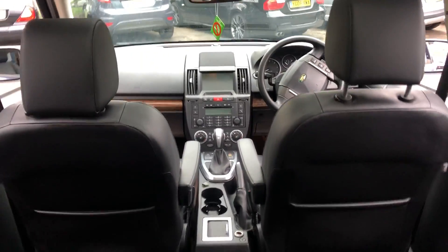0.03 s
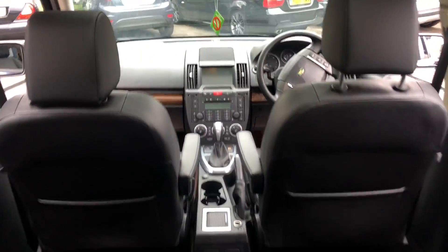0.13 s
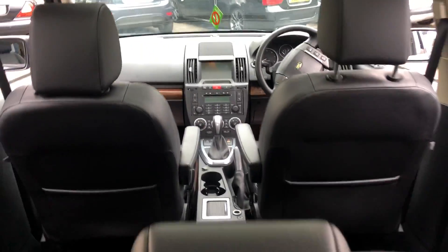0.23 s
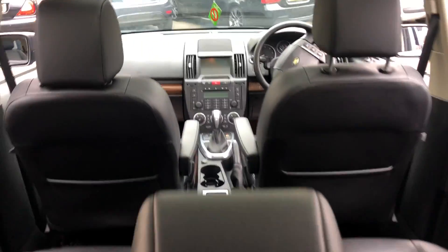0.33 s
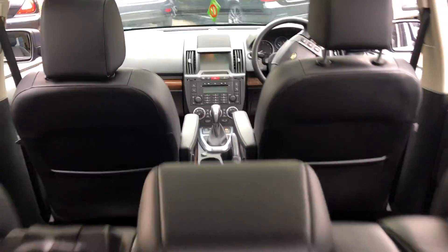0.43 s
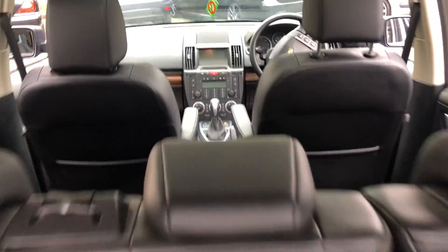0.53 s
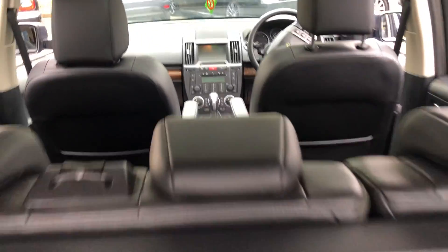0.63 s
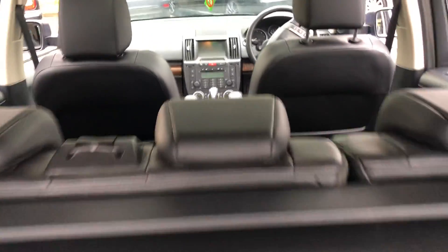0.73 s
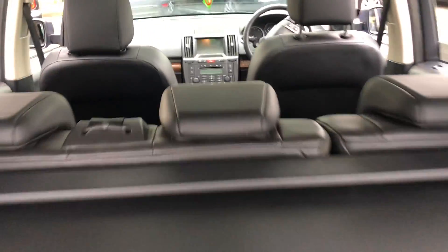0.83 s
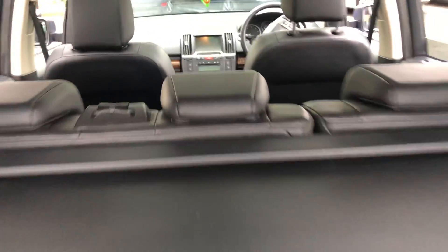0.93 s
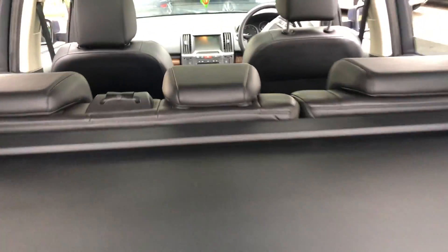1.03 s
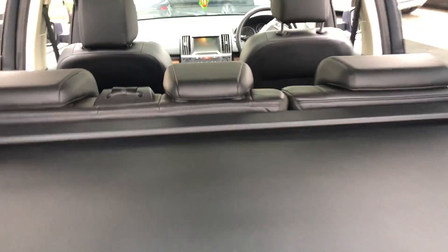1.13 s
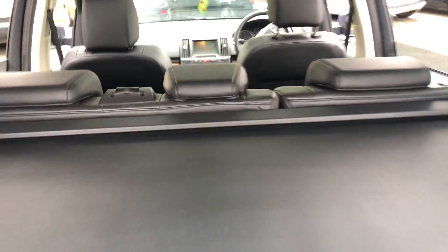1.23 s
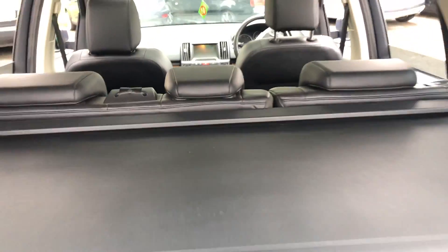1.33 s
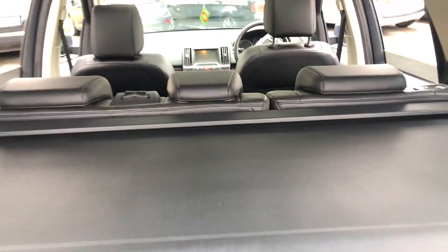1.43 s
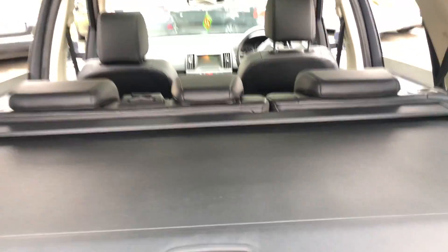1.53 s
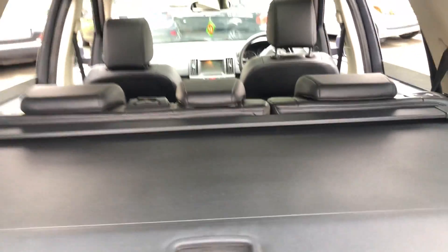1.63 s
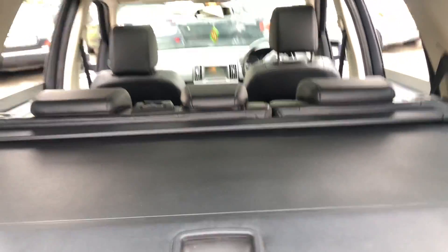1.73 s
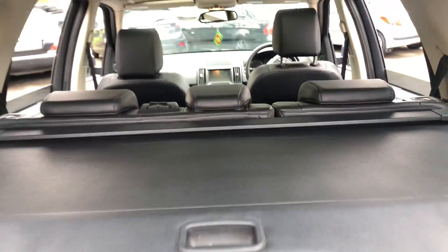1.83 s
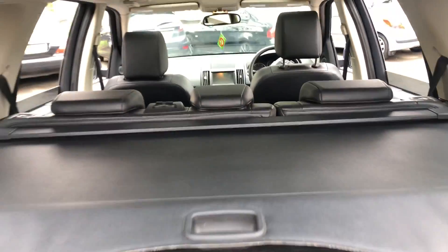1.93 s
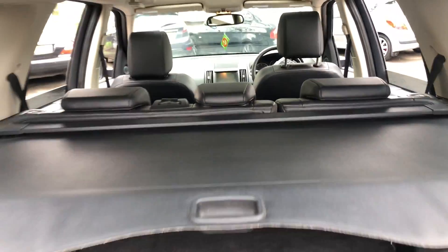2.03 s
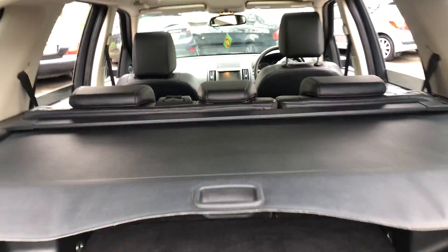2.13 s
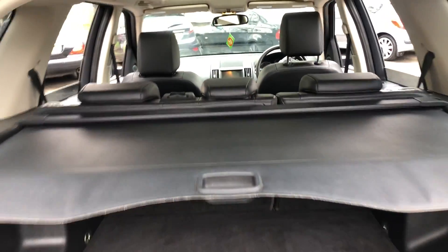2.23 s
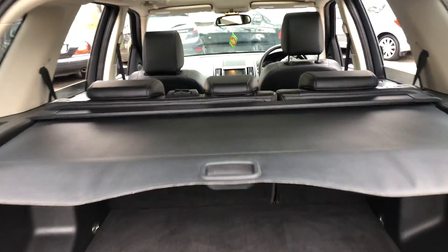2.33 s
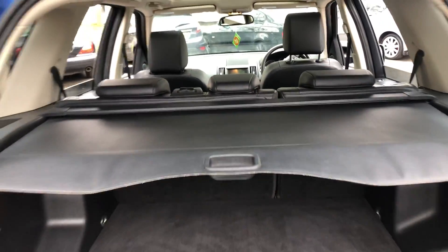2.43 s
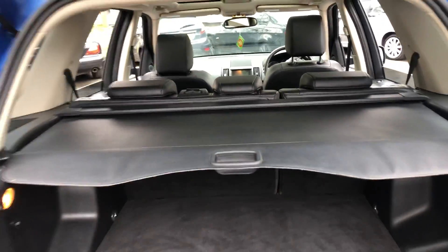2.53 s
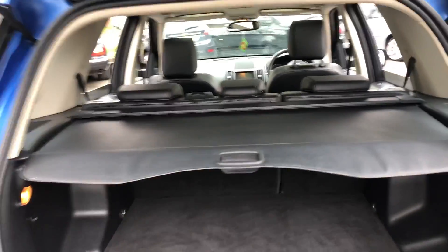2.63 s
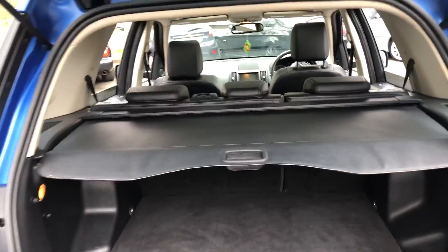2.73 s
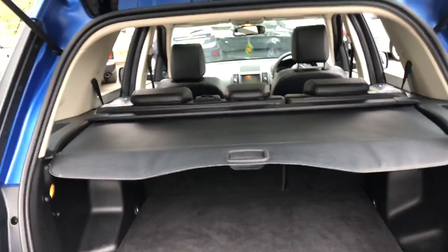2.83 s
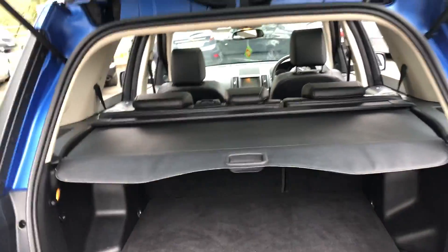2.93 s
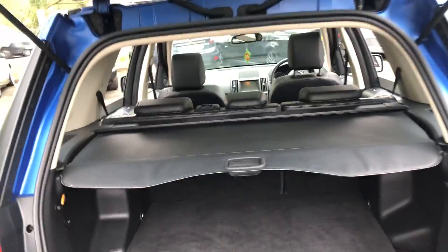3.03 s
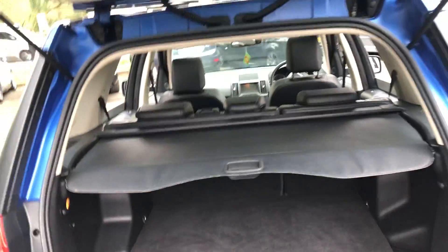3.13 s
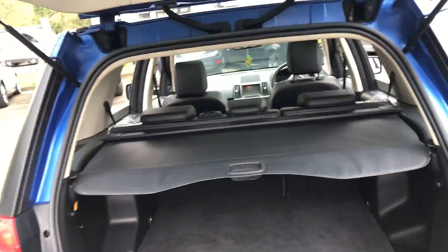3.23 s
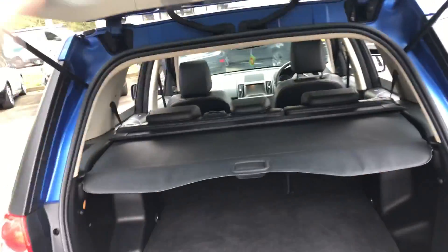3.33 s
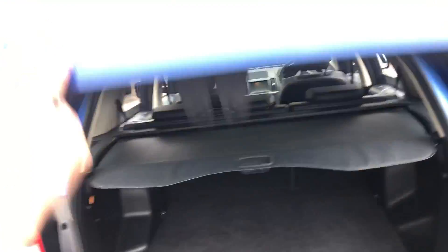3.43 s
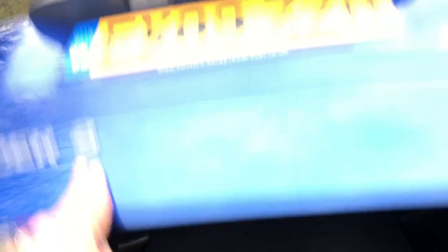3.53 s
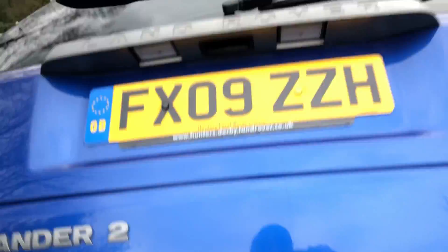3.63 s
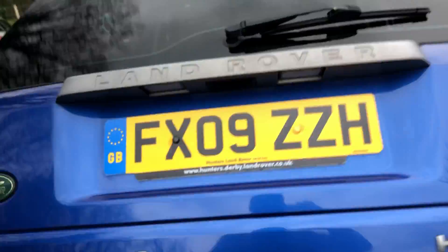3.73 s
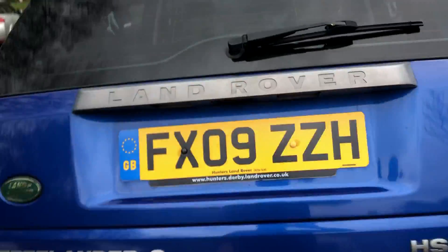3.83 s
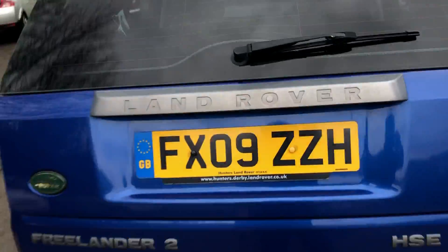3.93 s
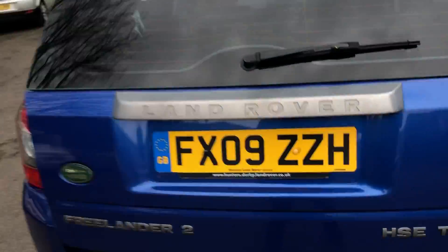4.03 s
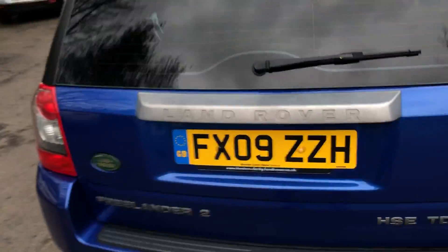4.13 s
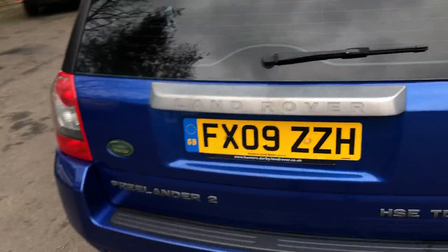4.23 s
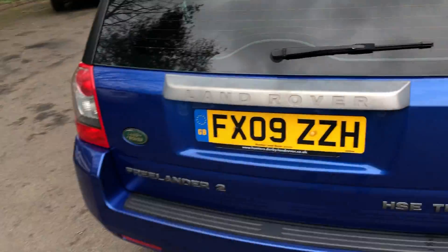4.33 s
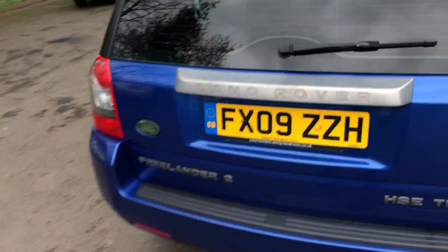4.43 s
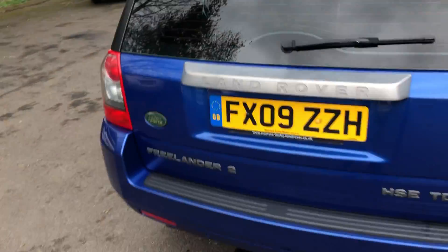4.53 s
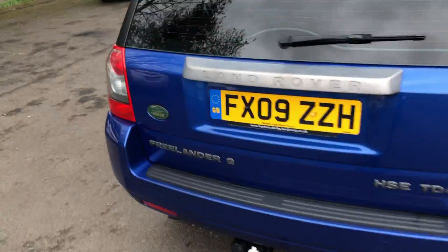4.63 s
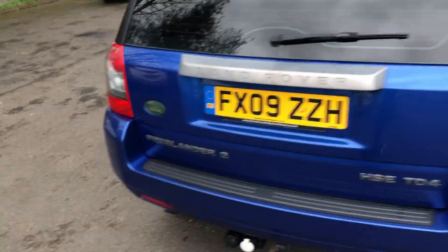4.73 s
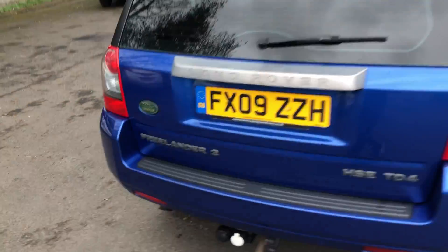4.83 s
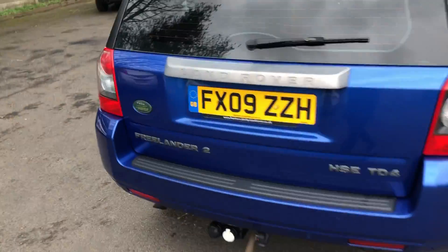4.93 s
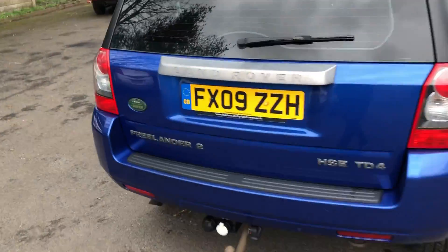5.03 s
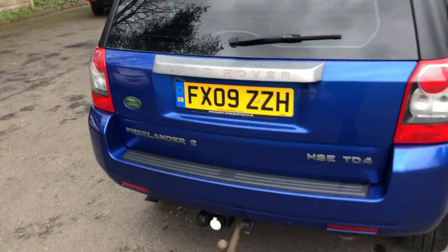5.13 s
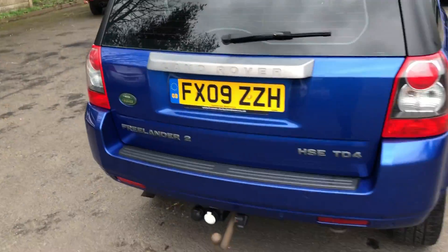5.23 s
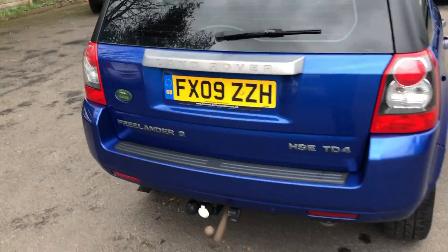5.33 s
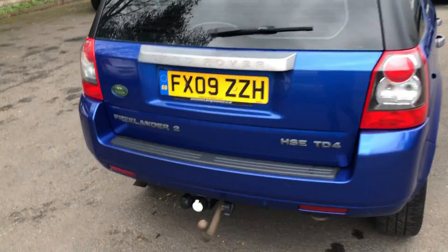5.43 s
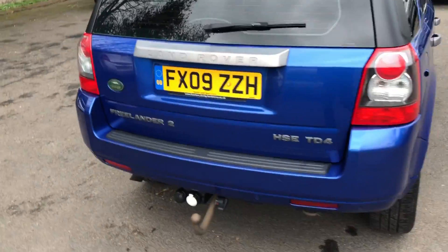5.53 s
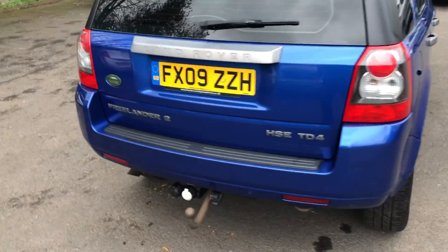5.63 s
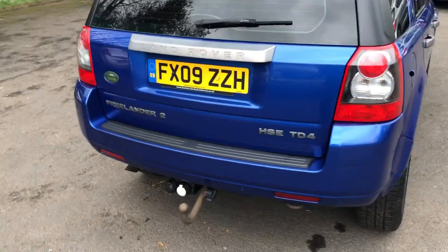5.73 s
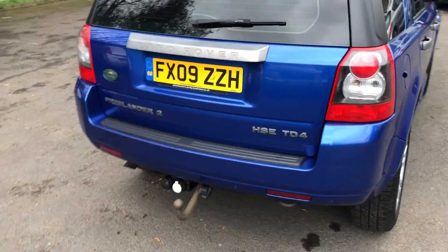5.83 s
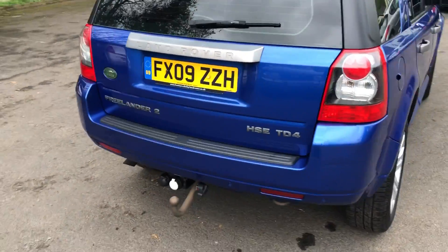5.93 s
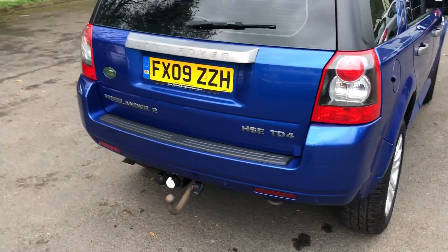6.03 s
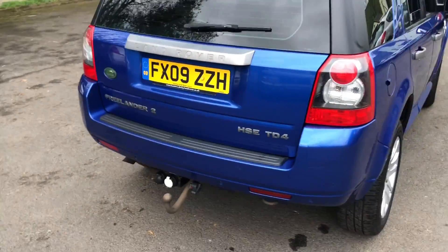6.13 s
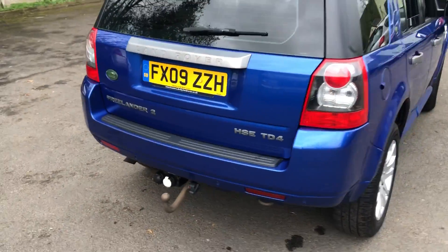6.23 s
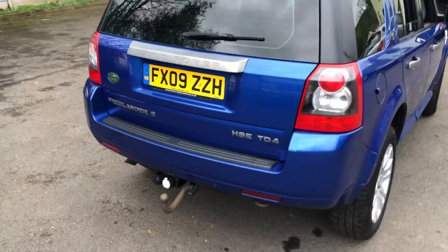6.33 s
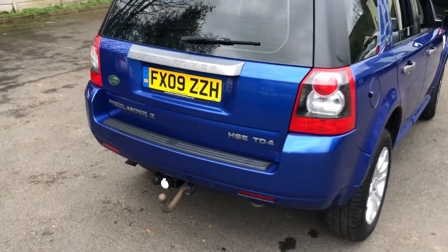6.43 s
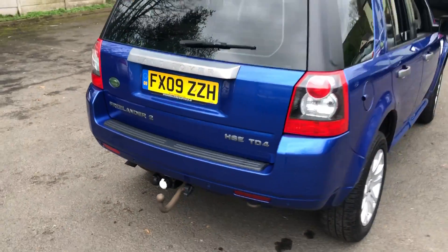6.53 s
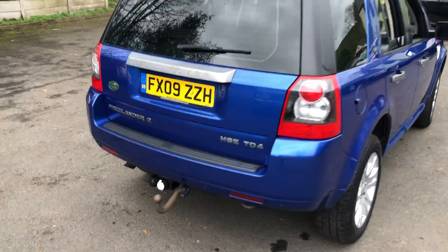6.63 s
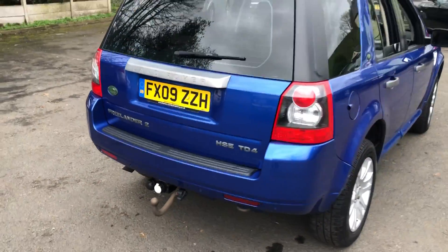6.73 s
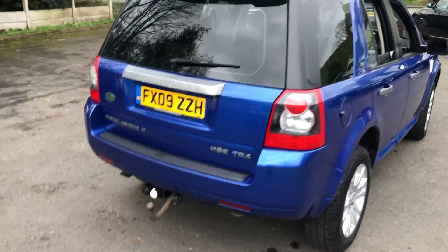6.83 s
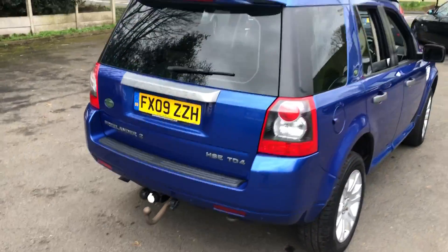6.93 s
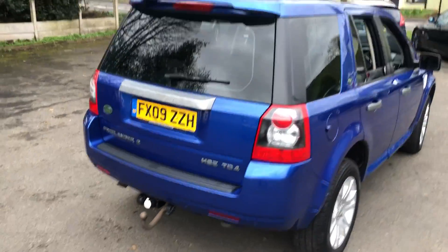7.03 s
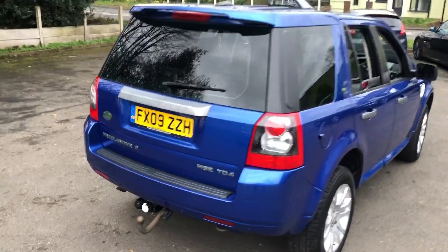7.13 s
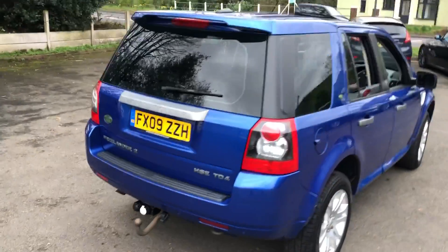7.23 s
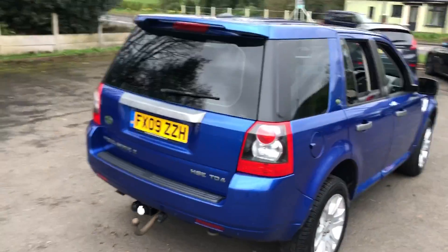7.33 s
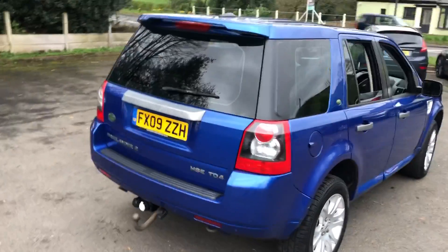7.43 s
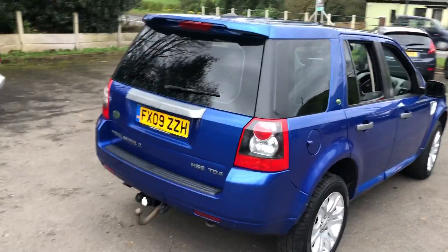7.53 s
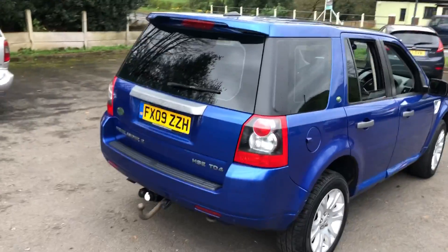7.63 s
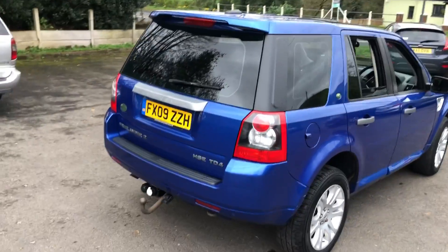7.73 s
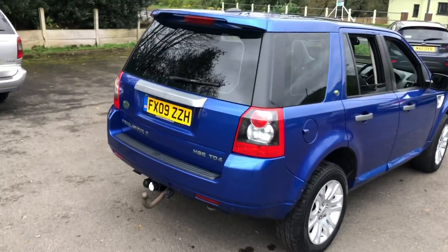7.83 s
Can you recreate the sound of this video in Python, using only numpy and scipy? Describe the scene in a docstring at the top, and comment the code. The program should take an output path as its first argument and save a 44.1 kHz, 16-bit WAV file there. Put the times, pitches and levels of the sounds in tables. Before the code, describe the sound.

A steady low rumble and distant traffic fill a car lot, slightly muffled at first as the microphone moves from the cabin to the outside, rustling faintly. Then a car's tailgate is shut with one loud bang, the latch cracking over a deep thump and a brief chatter of trim. A weak, dull tail dies quickly, leaving the quiet outdoor background with soft hums and a few dry clicks.

```python
"""We start between the seats of a parked car: a thin whine, low hums and shielded outdoor noise.
From about 1 s the microphone backs out of the boot; the whine fades and distant traffic opens up over
the lot's steady rumble, with faint rustles of handling. At 4.26 s the tailgate is slammed once: the latch
strikes, the steel panel booms, the seal pushes air into the cabin and the trim chatters.
A dull tail scatters off cars and walls, leaving the lot with a few more clicks, rustles and hums."""
import sys
import numpy as np
from scipy import signal
from scipy.fft import rfft, irfft
from scipy.io import wavfile

SR = 44100
rng = np.random.default_rng(int(sys.argv[2]) if len(sys.argv) > 2 else 0)


def store_pcm(level_fs):
    """Save levels as 16-bit WAV."""
    pcm = np.round(np.clip(level_fs, -1, 1) * 32767).astype(np.int16)
    wavfile.write(sys.argv[1], SR, np.atleast_2d(pcm).T)


N = 348063

# the outdoor bed, from low rumble up to high sizzle: frequency_hz, density_db
LOT_RUMBLE = [(20, -30), (35, -17), (48, 2), (62, 6), (85, -5)]
TRAFFIC_BODY = [(85, 1), (115, 0.5), (160, -0.5), (215, -1), (260, -2.5), (315, -1.5), (380, -9)]
TYRE_ROAR = [(380, -3), (450, 1), (570, -1.5), (750, 0.5), (920, 2.5), (1100, 0), (1250, -5.5)]
TRAFFIC_HISS = [(1250, 0), (1600, -3.5), (2000, -7.5), (2400, -11)]
FINE_HISS = [(2400, 0), (3000, -0.5), (4000, -3.5), (4600, -7), (6500, -12), (9000, -17.5), (12000, -24.5),
             (16000, -33)]
HIGH_SIZZLE = [(9000, -9), (12000, -3), (13300, -4), (16000, -3)]
# swells of the outdoor noise: peak_s, half_width_s, boost_db
OUTDOOR_SWELLS = [(3.25, 0.65, 4.5), (5.5, 1, 3), (5.9, 0.25, 2)]
# low hums that come and go: start_s, end_s, pitch_hz, width_hz, level_db
LOW_HUMS = [(-.3, 0.93, 302, 14, -48.5), (-.2, 1.6, 55, 4.4, -48.5), (0.75, 1.42, 75.8, 5.8, -44),
            (1.302, 2.2, 99, 25, -45), (2.8, 3.4, 210, 18, -43), (6.6, 8.6, 47.7, 1.15, -43.5),
            (5.86, 5.99, 224, 16, -38)]
# colour of the whine inside the car: frequency_hz, density_db
WHINE_SPECTRUM = [(10600, -30), (11100, -7), (11350, -6), (11600, 0), (11850, -12), (12200, -35)]
# its fader curve: time_s, level_db
WHINE_FADER = [(0, -83), (.6, -77.5), (1.15, -76), (1.5, -92), (1.7, -130)]
# small dry clicks: start_s, level_db, pitch_hz
DRY_CLICKS = [(3.5756, -27, 8000), (4.9035, -29, 5500), (7.019, -30, 14000), (7.4024, -30, 4000),
              (7.4161, -26, 3520), (7.4328, -27.5, 3520)]
# rustles and creaks of handling: start_s, length_s, level_db, centre_hz, snaps_per_s
HANDLING_RUSTLES = [(0, 0.5, -69.5, 6000, 5000), (0.909, 0.047, -70, 8000, 900),
                    (1.663, 0.032, -60, 11000, 1500), (2.199, 0.44, -73, 13000, 5000),
                    (2.666, 0.043, -59, 9000, 960), (2.701, 0.03, -57, 4970, 980),
                    (2.881, 0.53, -61.5, 4460, 5000), (3.285, 0.04, -56, 6500, 2900),
                    (3.421, 0.091, -61.5, 9000, 200), (3.588, 0.023, -61, 7000, 700),
                    (5.056, .08, -70, 10000, 500), (5.721, 0.43, -62.5, 3800, 5000),
                    (6.802, 0.031, -64, 11000, 900), (7.624, .2, -68.5, 11000, 3300)]
# short raspy chirps: start_s, length_s, pitch_hz, level_db
RASPY_CHIRPS = [(1.617, .022, 4070, -58), (1.654, 0.026, 3900, -61), (1.673, 0.021, 4350, -58)]
# air pushed into the cabin as the gate rocks on its seal: start_s, level_db, pitch_hz, t60_s
AIR_PUSHES = [(4.2826, 1.5, 85, 0.034), (4.297, -20, 56, 0.4), (4.3450, -13, 59.7, 0.076),
              (4.463, -26.5, 72.4, 0.11)]
# ringing modes of the steel panel and of the latch: pitch_hz, level_db, t60_s
PANEL_MODES = [(131, -11, 0.19), (204, 6, 0.16), (220.8, -3, 0.37), (290.3, -2.5, 0.26), (375, -15, 0.32),
               (442, -10.5, 0.23), (558, -11, 0.12), (596, -4.5, 0.11), (650, -21, 0.076), (758, -16, .14),
               (808, -15, .16), (1035, -5, 0.16)]
LATCH_MODES = [(1615, 0, 0.12), (1660, 5.5, 0.093), (1770, -14, .1), (1870, -1, .1), (2460, -7, 0.27),
               (2630, -1, 0.14), (2910, -6, 0.11), (3170, -5, 0.13), (3450, -6, .1), (4200, -2, 0.13),
               (4760, -11, 0.08), (5000, -16, 0.1), (5770, -20, .13), (6720, -6, 0.09), (9500, -21, .3),
               (11450, -20, 0.23)]
# their crowds of weaker modes, played as noise: frequency_hz, density_db
PANEL_WASH = [(40, -30), (110, -5), (220, 4.5), (400, -2), (700, 0), (1050, -12.5), (1500, -20),
              (3000, -38), (8000, -70)]
LATCH_WASH = [(450, -6), (800, 0), (1250, -5.5), (1600, 4), (2150, -3.5), (3000, -1), (4200, -4),
              (6000, -9.5), (8500, -14), (11500, -15), (16000, -19)]
# the gate's blows on latch and stops: start_s, panel_db, latch_db, latch_tilt_db_per_octave
GATE_BLOWS = [(4.2621, -33, -10, -3), (4.2680, -10.5, -24.5, 7), (4.2717, -17.5, -18.5, 3),
              (4.2772, -17.5, -23, -4), (4.299, -18.5, -17, -1), (4.3080, -14.5, -27, 0),
              (4.3190, -19, -24.5, 2), (4.3335, -19.5, -42, -3), (4.351, -21, -28.5, -1.5),
              (4.3604, -20, -32.5, -4.5), (4.3850, -25.5, -57, 0)]


def gain_of(db):
    """Decibels to amplitude."""
    return 10 ** (np.asarray(db) / 20)


def unit_rms(x):
    """Scales to rms 1."""
    return x / np.sqrt(np.mean(x ** 2) + 1e-20)


def add(mix, start_s, sound):
    """Drops a sound into the mix at start_s."""
    part = mix[max(round(start_s * SR), 0):][:len(sound)]
    part += sound[:len(part)]


def noise(spectrum, size, tilt_db=0):
    """Noise of rms 1 with a given spectrum, tilted per octave and falling steeply past its ends."""
    octave = np.log2(np.fft.rfftfreq(size, 1 / SR) + 1)
    hz, db = np.transpose(spectrum)
    octaves_outside = abs(octave - np.clip(octave, np.log2(hz[0]), np.log2(hz[-1])))
    shape_db = np.interp(octave, np.log2(hz), db) + tilt_db * octave - 110 * octaves_outside
    return unit_rms(irfft(rfft(rng.standard_normal(size)) * gain_of(shape_db), size))


def drift(rate_hz):
    """A slow random modulator of rms 1."""
    hz = np.fft.rfftfreq(N, 1 / SR)
    return unit_rms(irfft(rfft(rng.standard_normal(N)) * np.exp(-(hz / rate_hz) ** 2), N))


def fade(t, rise_s, t60_s):
    """Envelope with a soft attack and an exponential decay."""
    return (1 - np.exp(-t / rise_s)) * np.exp(-np.log(1000) * t / t60_s)


def arch(length_s):
    """Half-sine envelope."""
    return np.sin(np.linspace(0, np.pi, round(length_s * SR)))


def impulses(size, per_s):
    """Spikes of random timing and strength."""
    return rng.standard_normal(size) * (rng.random(size) < per_s / SR)


def snap(hz):
    """A click that dies within about one cycle."""
    cycles = hz * np.arange(200) / SR
    return np.sin(2 * np.pi * cycles) * np.exp(-2 * cycles)


def ring(modes, t, rise_s, tilt_db, scatter_db, detune=0):
    """Damped modes; each blow lands elsewhere, so their balance varies and, with detune, their pitch."""
    hz, db, t60_s = np.transpose(modes)[:, :, None]
    louder, higher = rng.standard_normal((2,) + hz.shape)
    weight = gain_of(db + tilt_db * np.log2(hz) + scatter_db * louder)
    waves = np.sin(2 * np.pi * hz * (1 + detune * higher) * t)
    return (weight * waves * fade(t, rise_s, t60_s)).sum(0) / np.linalg.norm(weight)


def outdoor_layer(spectrum, level_db, shield_db, clear_s, swell_share):
    """One band of outdoor noise: the cabin shields it until clear_s, and it rides the swells."""
    t = np.arange(N) / SR
    leave_s = 0.96  # the microphone starts backing out
    inside = np.clip((clear_s - t) / (clear_s - leave_s), 0, 1)
    swell_db = sum(db * np.exp(-((t - peak_s) / width_s) ** 2) for peak_s, width_s, db in OUTDOOR_SWELLS)
    return gain_of(level_db - shield_db * inside + swell_share * swell_db) * noise(spectrum, N)


def lot_ambience():
    """The bed: steady rumble and distant traffic that opens up outside the car; the treble flickers."""
    rumble = gain_of(-47.5) * noise(LOT_RUMBLE, N)
    body = outdoor_layer(TRAFFIC_BODY, level_db=-45, shield_db=3, clear_s=2, swell_share=0.91)
    roar = outdoor_layer(TYRE_ROAR, level_db=-45.5, shield_db=4, clear_s=3.43, swell_share=0.38)
    hiss = outdoor_layer(TRAFFIC_HISS, level_db=-53.5, shield_db=6, clear_s=1.8, swell_share=0.69)
    fine = outdoor_layer(FINE_HISS, level_db=-60.5, shield_db=3, clear_s=2.3, swell_share=1.09)
    sizzle = outdoor_layer(HIGH_SIZZLE, level_db=-77.5, shield_db=16, clear_s=3.1, swell_share=0.9)
    flutter = gain_of(0.5 * drift(rate_hz=7))
    flicker = gain_of(2 * drift(rate_hz=16))
    return rumble + body + (roar + hiss + fine) * flutter + sizzle * flicker


def hums():
    """Low wavering tones that swell and fade."""
    out, t = np.zeros(N), np.arange(N) / SR
    for start_s, end_s, hz, width_hz, db in LOW_HUMS:
        progress = np.clip((t - start_s) / (end_s - start_s), 0, 1)
        swell = np.sqrt(abs(np.sin(np.pi * progress)))
        cycles = np.cumsum(hz + width_hz / 2 * drift(width_hz)) / SR
        out += gain_of(db + 2 * drift(width_hz)) * swell * np.sin(2 * np.pi * cycles)
    return out


def cabin_whine():
    """A very high, thin, wavering band of noise that fades as the microphone leaves the seats."""
    time_s, db = np.transpose(WHINE_FADER)
    fader_db = np.interp(np.arange(N) / SR, time_s, db)
    waver_db = 1.5 * drift(rate_hz=8)
    return gain_of(fader_db + waver_db) * noise(WHINE_SPECTRUM, N)


def small_foley():
    """Stray handling ticks, dry clicks, rustles made of many snaps, and a few raspy chirps."""
    out = gain_of(-50) * np.convolve(impulses(N, per_s=7), snap(hz=13000))[:N]
    for start_s, db, hz in DRY_CLICKS:
        add(out, start_s, gain_of(db) * snap(hz))
    for start_s, length_s, db, hz, snaps_per_s in HANDLING_RUSTLES:
        envelope = arch(length_s)
        snaps = impulses(len(envelope), snaps_per_s) * envelope
        add(out, start_s, gain_of(db) * unit_rms(np.convolve(snaps, snap(hz))))
    for start_s, length_s, hz, db in RASPY_CHIRPS:
        envelope = arch(length_s)
        narrow_band = [(hz * 0.93, -25), (hz, 0), (hz * 1.07, -25)]
        add(out, start_s, gain_of(db) * envelope * noise(narrow_band, len(envelope)))
    return out


def lot_reverb(sound):
    """A weak, dull tail scattered from the parked cars and walls around."""
    t = np.arange(SR) / SR
    colour = [(60, 4), (900, -10), (4000, -7.5), (16000, -11)]  # frequency_hz, density_db
    tail = noise(colour, len(t)) * fade(t, rise_s=0.025, t60_s=0.61)
    return gain_of(-27) * signal.fftconvolve(sound, tail / np.linalg.norm(tail))[:N]


def cabin_thud():
    """The slam's low end: the seal traps air, which swings a few times as a deep thud."""
    out, t = np.zeros(N), np.arange(SR) / SR
    for start_s, db, hz, t60_s in AIR_PUSHES:
        add(out, start_s, gain_of(db) * np.sin(2 * np.pi * hz * t) * fade(t, 0.0013, t60_s))
    return out


def trim_chatter():
    """Light random taps of the trim after the slam, ever weaker on the panel; rows like GATE_BLOWS."""
    start_s, length_s, count, fall_db_per_s = 4.41, 0.1, 6, 70
    taps = []
    for k in range(count):
        after_s = length_s * (k + rng.random()) / count
        scatter_db = 1.5 * rng.standard_normal()
        panel_db = -42 - fall_db_per_s * after_s + scatter_db
        latch_db = -50 + scatter_db
        taps.append((start_s + after_s, panel_db, latch_db, 0))
    return taps


def panel_boom(t, tilt_db):
    """The slam's body: the struck steel panel rings over a wash of weaker modes."""
    tone = gain_of(0.5) * ring(PANEL_MODES, t, rise_s=0.0011, tilt_db=tilt_db, scatter_db=4)
    wash = gain_of(-2) * noise(PANEL_WASH, len(t), tilt_db) * fade(t, rise_s=0.00075, t60_s=0.18)
    return tone + wash


def latch_strike(t, tilt_db):
    """The slam's bite: the latch rings, with a hard crack at contact and a weaker shimmer after."""
    rise_s = 0.0014
    tone = gain_of(-6.5) * ring(LATCH_MODES, t, rise_s, tilt_db, scatter_db=0.5, detune=0.0045)
    crack = fade(t, rise_s, t60_s=0.024)
    shimmer = gain_of(-10) * fade(t, rise_s, t60_s=0.17)
    return tone + gain_of(1.5) * noise(LATCH_WASH, len(t), tilt_db) * (crack + shimmer)


def tailgate():
    """Every blow shakes panel and latch; the panel dulls as the rubber seal cushions the gate."""
    boom, rattle, t = np.zeros(N), np.zeros(N), np.arange(SR // 2) / SR
    hard_tilt_db, soft_tilt_db, cushion_s = 2.4, -6, 0.04  # tilts are per octave
    contact_s = GATE_BLOWS[0][0]
    for start_s, panel_db, latch_db, latch_tilt_db in list(GATE_BLOWS) + trim_chatter():
        hardness = np.exp(-(start_s - contact_s) / cushion_s)
        panel_tilt_db = soft_tilt_db + (hard_tilt_db - soft_tilt_db) * hardness
        add(boom, start_s, gain_of(panel_db) * panel_boom(t, panel_tilt_db))
        add(rattle, start_s, gain_of(latch_db) * latch_strike(t, latch_tilt_db))
    low_cut = signal.butter(2, 450, "high", fs=SR, output="sos")  # small parts radiate no bass
    return boom + signal.sosfilt(low_cut, rattle)


def scene():
    """The mono mix: the slam and its tail over the bed and the small details."""
    slam = tailgate() + cabin_thud()
    return (slam + lot_reverb(slam) + lot_ambience() + hums() + cabin_whine() + small_foley())[None]


def record(dry):
    """Master chain: a sub-bass cut, a soft clip on the loudest peaks, then a steep high cut."""
    low_cut_hz, ceiling, high_cut_hz = 30, 0.75, 15950
    lean = signal.sosfilt(signal.butter(2, low_cut_hz, "high", fs=SR, output="sos"), dry)
    rounded = lean / (1 + (lean / ceiling) ** 8) ** (1 / 8)
    lowpass = signal.firwin(511, high_cut_hz, window=("kaiser", 9), fs=SR)
    return signal.oaconvolve(rounded, lowpass[None], "same")


dry = scene()
out = record(dry)
store_pcm(out)
```